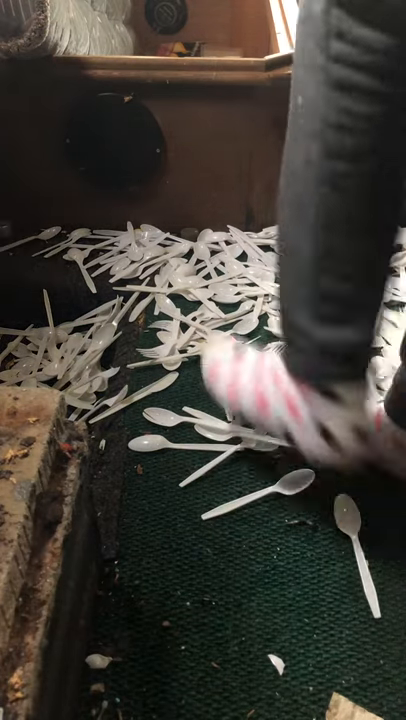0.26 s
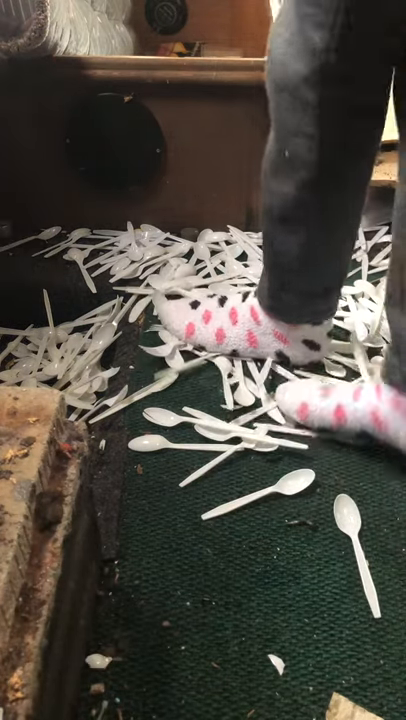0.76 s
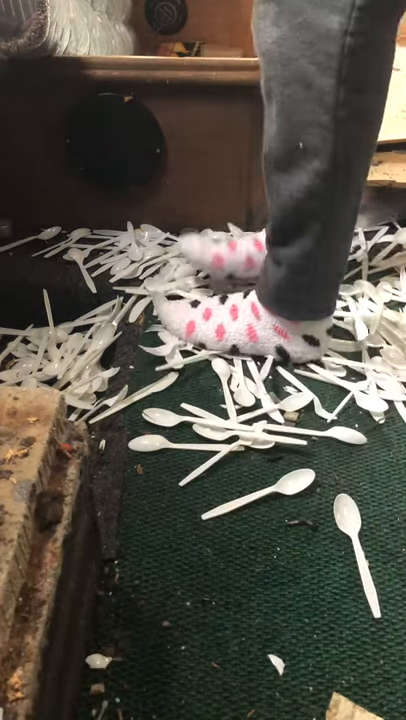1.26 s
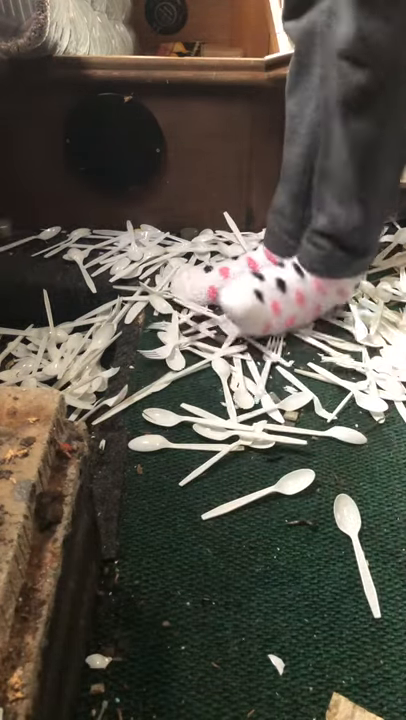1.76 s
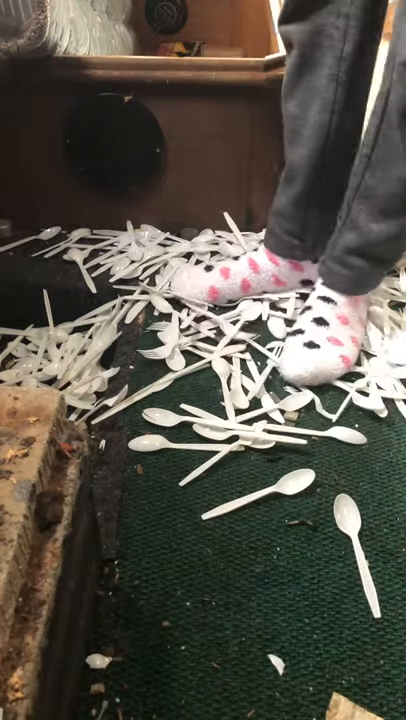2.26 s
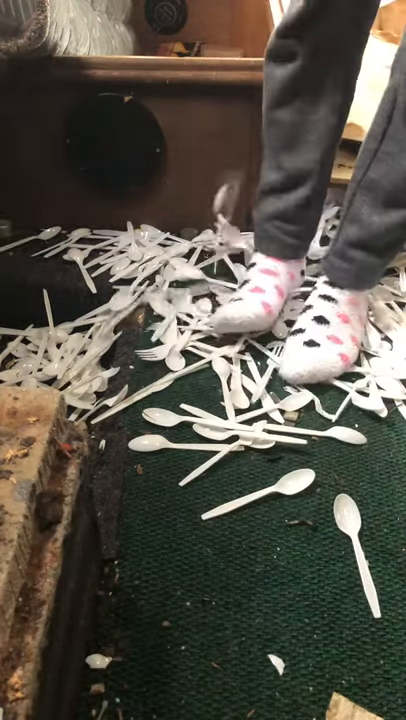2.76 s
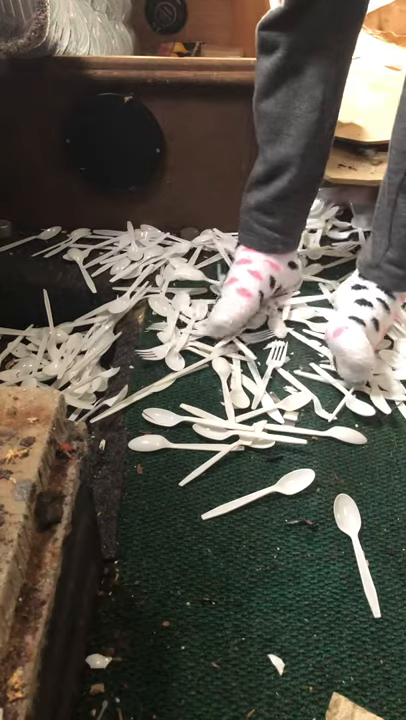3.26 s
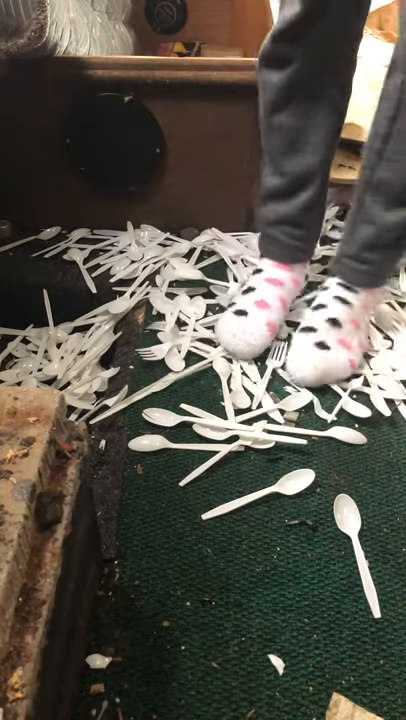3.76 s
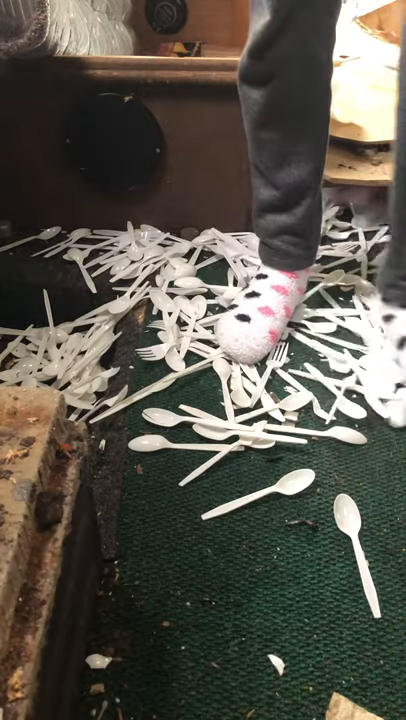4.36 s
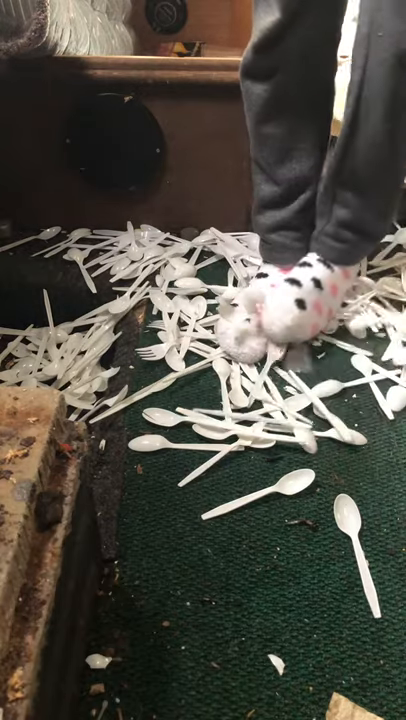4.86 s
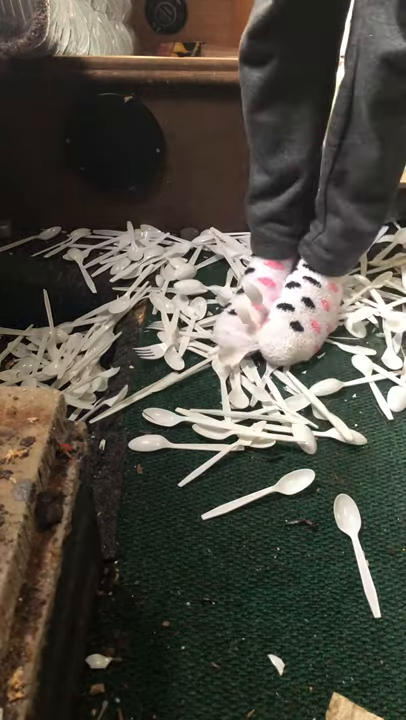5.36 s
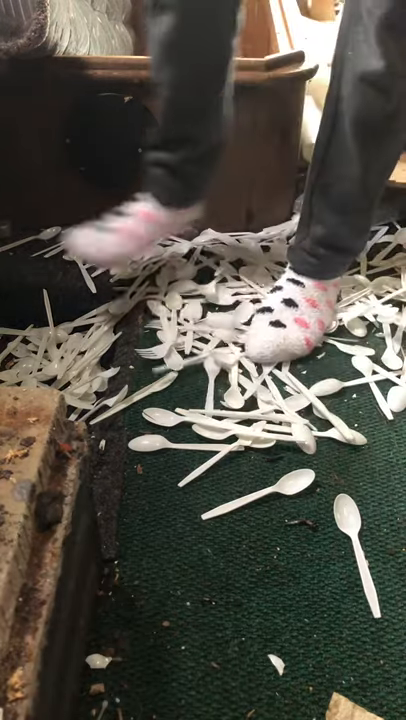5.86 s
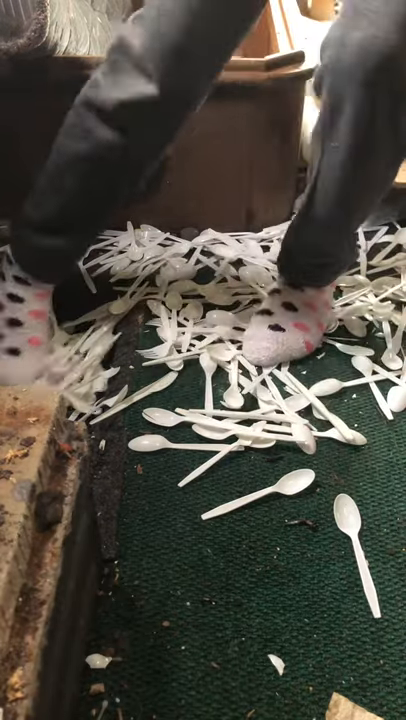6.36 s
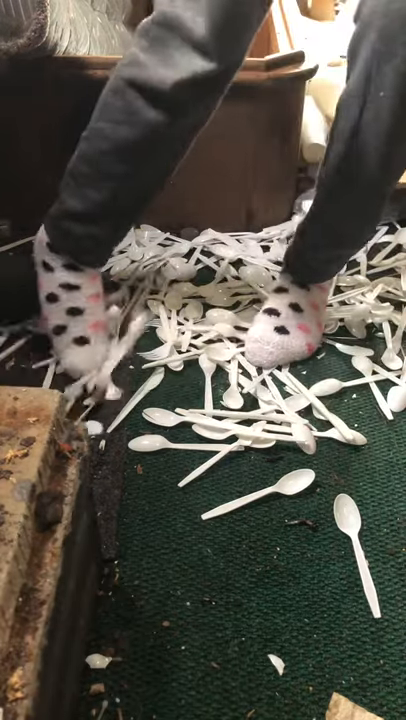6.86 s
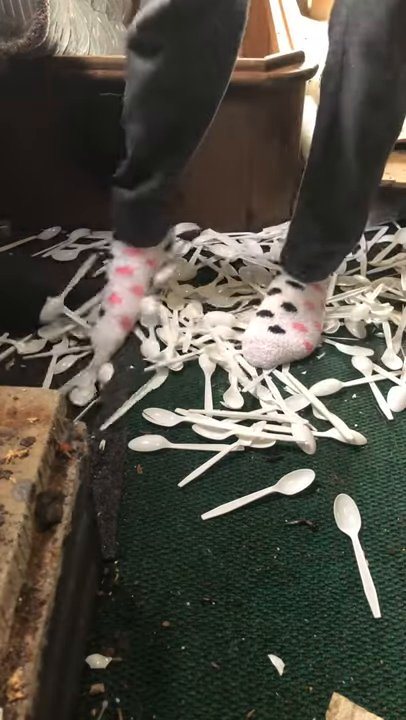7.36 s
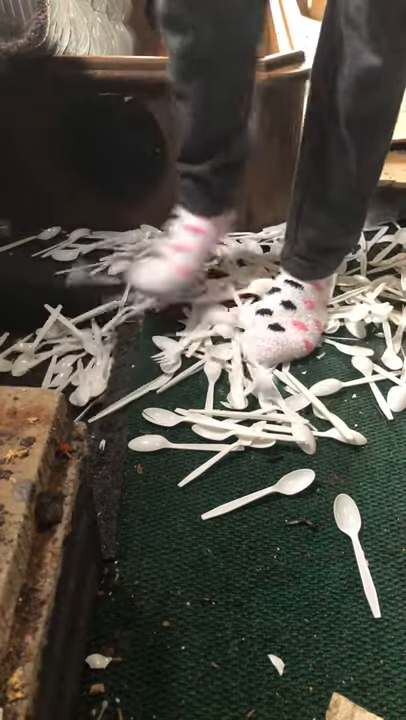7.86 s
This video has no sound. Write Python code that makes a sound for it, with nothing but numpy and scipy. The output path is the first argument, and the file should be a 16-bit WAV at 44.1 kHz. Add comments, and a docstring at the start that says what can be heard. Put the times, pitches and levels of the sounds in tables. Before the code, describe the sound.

Socked feet trample a heap of disposable plastic spoons and forks on carpet, with bright clattering, sharp cracks, hollow pops and soft thuds.

```python
"""A faint rumble and low hum in a small room; half a second in, feet in socks start to trample
a heap of disposable plastic spoons and forks on a carpet. Stirred pieces scrape and tick (filtered noise
and damped modes); loaded ones click, crack and ring (noise bursts, modes); spoon bowls buckle with
a hollow pop (shell modes, dull noise); each step thuds into the floor (filtered impulse and noise)."""
import sys
import numpy as np
from scipy import signal
from scipy.fft import rfft, irfft, next_fast_len
from scipy.io import wavfile
from scipy.ndimage import uniform_filter1d

SR = 44100
rng = np.random.default_rng(int(sys.argv[2]) if len(sys.argv) > 2 else 0)


def inscribe(sig):
    """Save sig as 16-bit PCM at rate SR to the path in sys.argv[1].

    A 1-D sig is mono; a 2-D sig holds one channel per row.
    Samples are clipped to [-1, 1] before scaling.
    """
    pcm = np.round(np.clip(np.atleast_2d(sig).T, -1, 1) * 32767)
    wavfile.write(sys.argv[1], SR, pcm.astype(np.int16))


N = 357210
TIME_S = np.arange(N) / SR
RING_S = np.arange(SR // 10) / SR  # time since a blow
RING_SIZE = len(RING_S)
TOP_HZ = 15850


def clatter(tick_trim_db=-1):
    """Pieces scrape and tick against each other; the feet touch only a few at a time as they work along."""
    reached_s = np.linspace(0, N / SR, 420)
    heap = [heap_piece(db) for db in shoving(reached_s)]
    times_s, sizes = contacts(count=2200, scatter_db=2.5, size=24)
    nearby = np.searchsorted(reached_s, times_s) + rng.integers(-3, 3, len(times_s))
    touched = np.clip(nearby, 0, len(heap) - 1)
    gains = sizes * undb(tick_trim_db + shoving(times_s)) * stick_slip(times_s)
    out = scraping(heap, reached_s)
    for start_s, gain, k in zip(times_s, gains, touched):
        add(out, start_s, gain * heap[k])
    return out


def scraping(heap, reached_s, trim_db=-5):
    """Pieces slide over each other: friction keeps each one sounding briefly before the next takes over."""
    slide = unit(np.hanning(3 * N // len(heap))) * np.sqrt(N / len(heap))
    out = np.zeros(N)
    for start_s, sound in zip(reached_s - len(slide) / SR / 2, heap):
        friction = slide * rng.standard_normal(len(slide))
        add(out, start_s, signal.fftconvolve(friction, sound))
    moments_s = TIME_S[::40]
    gain = undb(trim_db + shoving(moments_s)) * stick_slip(moments_s)
    return out * np.interp(TIME_S, moments_s, gain)


# a foot presses, drags or lifts through the heap:
# start_s, swell_s, length_s, clatter_db (before tick and scrape trims), knock_db
SHOVES = [(0.532, 0.009, 0.028, -36, -53), (0.619, .005, 0.14, -41.5, -49), (0.837, 0.013, 0.13, -34, -64),
          (1.003, 0.013, 0.11, -38, -67), (1.212, 0.091, 0.14, -29, -45.5),
          (1.365, 0.023, 0.18, -36.5, -48.5), (1.529, .01, 0.12, -43, -57),
          (1.731, 0.2, 0.31, -36.5, -48.5), (2.064, 0.012, 0.08, -48.5, -54),
          (2.181, 0.0089, 0.093, -30.5, -46.5), (2.352, 0.0058, .05, -38.5, -51),
          (2.404, 0.0069, 0.056, -25, -46), (2.48, .01, 0.15, -31.5, -60), (2.625, 0.044, 0.33, -28, -46.5),
          (2.922, 0.0077, .14, -30.5, -49), (3.112, 0.02, 0.048, -39.5, -49), (3.194, .01, 0.087, -53, -55),
          (3.33, 0.024, 0.062, -51, -58), (3.476, 0.22, 0.42, -49, -58),
          (3.729, 0.064, 0.066, -38.5, -52.5), (3.926, .03, 0.15, -40, -59), (4.251, 0.01, 0.01, -45, -62),
          (4.261, 0.0092, 0.064, -28, -49), (4.363, 0.077, 0.17, -28.5, -46.5),
          (4.562, 0.073, 0.36, -23, -43), (4.915, .01, 0.22, -38.5, -55.5),
          (5.226, 0.17, 0.34, -52.5, -56.5), (5.579, 0.0055, 0.022, -19.5, -47),
          (5.665, 0.04, 0.064, -22, -42.5), (5.844, 0.14, 0.13, -42, -56),
          (6.134, 0.035, 0.039, -43.5, -57), (6.235, 0.023, 0.13, -33, -54), (6.353, 0.033, 0.12, -27, -48),
          (6.516, .12, 0.14, -25, -50), (6.7, .01, .12, -32.5, -52.5), (6.798, 0.04, 0.2, -21, -39),
          (7.008, 0.011, 0.275, -26.5, -46.5), (7.316, 0.17, 0.27, -25.5, -50),
          (7.46, 0.15, 0.43, -22.5, -46.5), (7.915, 0.03, 0.27, -32, -53)]
GRIP_DB = 8.5  # a shove starts this far under its peak
SAG_DB_PER_S = 24  # the pieces make way while the foot pushes on
SETTLE_DB_PER_S = 249  # the heap comes to rest once the foot stops
KNOCK_SETTLE_DB_PER_S = 168  # the pieces under the sole take longer
REST_CLATTER_DB, REST_KNOCK_DB = -78.5, -74.5  # the heap creeps between shoves


def shoving(t_s, knock=False):
    """Clatter or knocking level in dB: each shove swells, sags while it lasts, then settles; the loudest counts."""
    start_s, swell_s, length_s, clatter_db, knock_db = np.transpose(SHOVES)[:, :, None]
    if knock:
        peak_db, settle_db_per_s, rest_db = knock_db, KNOCK_SETTLE_DB_PER_S, REST_KNOCK_DB
    else:
        peak_db, settle_db_per_s, rest_db = clatter_db, SETTLE_DB_PER_S, REST_CLATTER_DB
    age_s = t_s - start_s
    grip_db = GRIP_DB * np.clip(1 - age_s / np.maximum(swell_s, 1e-3), 0, 1)
    sag_db = SAG_DB_PER_S * np.maximum(age_s - swell_s, 0)
    settle_db = settle_db_per_s * np.maximum(age_s - length_s, 0)
    level_db = np.where(age_s >= 0, peak_db - grip_db - sag_db - settle_db, rest_db)
    return np.maximum(level_db.max(axis=0), rest_db)


def stick_slip(times_s):
    """Gain of a heap that holds and gives way by turns, about thirty times a second."""
    knots_s = np.cumsum(rng.uniform(.006, .028, 600))
    swing_db = 2.2 * rng.uniform(.2, 1.6, len(knots_s)) * (-1) ** np.arange(len(knots_s))
    return undb(np.interp(times_s, knots_s, swing_db))


def contacts(count, scatter_db, size):
    """Times and sizes of random contacts: many faint, a few strong, at unit power over `size` neighbours."""
    times_s = np.sort(rng.uniform(0, N / SR, count))
    sizes = undb(scatter_db * np.minimum(rng.exponential(size=count), np.log(150)))
    local_power = uniform_filter1d(sizes ** 2, size) * count / N
    return times_s, sizes / np.sqrt(local_power)


# colour of a bare plastic contact: freq_hz, gain_db
TICK_COLOUR = [(200, -25), (700, -7), (1300, -7.5), (2200, 0), (3600, 2.5), (5600, 3.5), (6700, -1.5),
               (8000, 2), (9800, -3), (12500, 3.5), (15800, 0), (17500, -9)]


def heap_piece(stir_db, ring_db=-3, hardness_db_per_octave=1.5, firm_db=-35, hardening=0.12):
    """One piece in its spot: a tick of its own colour and its ring, brighter the harder it is shoved."""
    own_colour = [(hz, db + 2.5 * rng.standard_normal()) for hz, db in TICK_COLOUR]
    tick = unit(colour(burst(t60_s=.014), own_colour))
    tilt_db = hardening * (stir_db - firm_db) + hardness_db_per_octave * rng.standard_normal()
    return unit(room(brighten(tick + undb(ring_db) * piece(), tilt_db)))


# nominal modes of one piece of cutlery: freq_hz, level_db
PIECE_MODES = [(1890, -13.5), (2750, -21), (3950, -3), (5200, -5.5), (5880, 1), (7380, -1), (8430, -2),
               (10500, -8.5), (11850, -6.5), (13000, -15)]
SHARD_SHARE = .35  # chance that a piece is broken
RING_T60_S = .042  # nominal: the heap and the carpet soon stop a piece


def piece(spread=0.026, scatter_db=5.0, shard_octaves=0.19):
    """Ring of one piece: size detunes it, the point struck picks the modes, the neighbours damp it."""
    hz, db = np.transpose(PIECE_MODES)[:, :, None]
    detune, strength, phase = rng.standard_normal((3, len(PIECE_MODES), 1))
    # a broken shard has a length, and so a pitch, of its own
    broken = rng.random() < SHARD_SHARE
    shift = 2 ** (broken * shard_octaves * rng.uniform(-1.018, 1))
    hz = np.minimum(hz * (1 + spread * detune) * shift, TOP_HZ)
    t60_s = RING_T60_S * rng.uniform(.6, 1.5) * np.minimum(10000 / hz, 1)  # high modes die sooner
    waves = np.sin(2 * np.pi * (hz * RING_S + phase))
    return unit(np.sum(undb(db + scatter_db * strength) * waves * fade(t60_s), axis=0))


# pieces that break and splinter under the foot: start_s, level_db (onset rms)
CRACKS = [(0.533, -37), (0.541, -28), (0.63, -40), (0.815, -30), (0.844, -32.5), (0.965, -26), (1.088, -16),
          (1.319, -20.5), (1.422, -20), (1.5, -31.5), (1.799, -26), (1.879, -31), (1.921, -29),
          (1.992, -22), (2.076, -29), (2.184, -24), (2.277, -31.5), (2.407, -14.5), (2.574, -26),
          (2.628, -23), (2.826, -21), (2.924, -15), (3.019, -27.5), (3.131, -32), (3.781, -34.5),
          (3.965, -35), (4.001, -32.5), (4.295, -22), (4.387, -28.5), (4.449, -26.5), (4.488, -28),
          (4.561, -21.5), (4.595, -17.5), (4.639, -14), (4.664, -13), (4.787, -19), (5.377, -44.5),
          (5.515, -28), (5.561, -26.5), (5.588, -16.5), (5.697, -17.5), (5.717, -15.5), (6.853, -14.5),
          (6.882, -15.5), (6.907, -18), (7.072, -18), (7.089, -16), (7.511, -17.5), (7.585, -24),
          (7.705, -20), (7.874, -22), (7.972, -17.5), (7.981, -13), (8.09, -24)]
CRACK_EVEN_DB = -39.5  # a crack this strong gets no treble tilt
CRACK_HARDENING = 0.16  # dB per octave of extra treble for each dB above that


def cracks(ring_db=-5, snap_db=-6, snap_t60_s=0.023, splinter_t60_s=0.061, spread_s=0.0036, splinter_db=3):
    """A snap and uneven splintering that spreads and dies while the piece rings; strong ones are brighter."""
    out = np.zeros(N)
    for start_s, level_db in CRACKS:
        steps = undb(splinter_db * rng.standard_normal(RING_SIZE))
        uneven = np.repeat(steps, 32)[:RING_SIZE]
        splinters = unit(burst(splinter_t60_s) * uneven * np.minimum(RING_S / spread_s, 1))
        fracture = splinters + undb(snap_db) * unit(burst(snap_t60_s))
        tilt_db = CRACK_HARDENING * (level_db - CRACK_EVEN_DB)
        add(out, start_s, struck(fracture, level_db, ring_db, tilt_db))
    return out


# a bent piece slips off its neighbour with one dry click: start_s, level_db (onset rms)
CLICKS = [(0.57, -21.5), (1.735, -42), (2.172, -41), (2.258, -29), (2.356, -31), (2.549, -24.5),
          (2.911, -25), (3.233, -41), (3.598, -42), (3.906, -30), (4.057, -39.5), (4.178, -50),
          (4.697, -24), (4.755, -23), (4.898, -20), (5.01, -32), (5.179, -42.5), (5.351, -42.5),
          (5.454, -45), (5.667, -16.5), (5.859, -30), (6.135, -25.5), (6.959, -16), (7.171, -22.5),
          (7.325, -32), (7.437, -20.5)]


def clicks(t60_s=0.023, ring_db=-7, tilt_db=1.5):
    """One short, bright contact; the piece stays pinned and hardly rings."""
    out = np.zeros(N)
    for start_s, level_db in CLICKS:
        add(out, start_s, struck(burst(t60_s), level_db, ring_db, tilt_db))
    return out


def struck(contact, level_db, ring_db, tilt_db):
    """A contact and the ring of its piece at a given level, tilted to the treble by tilt_db per octave."""
    sound = unit(colour(contact, TICK_COLOUR)) + undb(ring_db) * piece()
    return attack(room(brighten(sound, tilt_db)), level_db, size=176)


# spoon bowls that buckle under the sole: start_s, level_db (before trim_db), pitch_hz
POPS = [(0.57, -16.5, 590), (1.09, -22.5, 1330), (1.679, -32, 1300), (1.745, -37, 625), (1.783, -37, 470),
        (2.08, -28.5, 787), (2.257, -28.5, 1045), (2.911, -24.5, 970), (3.907, -28.5, 450),
        (5.029, -28, 950), (5.514, -23.5, 460), (5.587, -8.5, 1116), (6.136, -16.5, 1065),
        (6.439, -27, 950), (6.525, -29, 855), (6.553, -29.5, 1300)]
# modes of a spoon bowl: pitch_multiple, level_db
BOWL_MODES = [(1, 0.5), (1.7, -5.5), (2.75, -9)]


def pops(bowl_t60_s=0.02, crunch_db=-4, crunch_t60_s=0.095, trim_db=-6):
    """A bowl gives way: a few heavily damped shell modes and a dull crunch."""
    crunch_colour = [(40, -72), (300, -3.5), (1200, -0.5), (3000, -6.5), (8000, -21)]  # Hz, dB
    out = np.zeros(N)
    for start_s, level_db, pitch_hz in POPS:
        modes = sum(undb(mode_db) * np.sin(2 * np.pi * multiple * pitch_hz * RING_S)
                    for multiple, mode_db in BOWL_MODES)
        crunch = unit(colour(burst(crunch_t60_s), crunch_colour))
        sound = unit(modes * fade(bowl_t60_s)) + undb(crunch_db) * crunch
        add(out, start_s, attack(room(sound, wet_db=-7), level_db + trim_db, size=176))
    return out


# the foot meets the floor: start_s, level_db (onset rms)
THUDS = [(0.572, -38.5), (1.096, -35.5), (2.086, -45), (2.915, -34.5), (3.906, -38.5), (5.517, -30),
         (5.589, -35.5), (5.713, -41.5), (6.139, -38), (6.442, -31), (6.528, -36.5), (6.556, -42)]
# colour of the floor under a step: freq_hz, gain_db
FLOOR_COLOUR = [(40, -55), (120, 0), (198, 8), (300, -9), (480, -6), (1000, -19.5), (6000, -69)]


def thuds(t60_s=0.073, rumble_db=-6):
    """The step goes through the carpet as one push, and the floor shakes briefly after it."""
    out = np.zeros(N)
    for start_s, level_db in THUDS:
        push = signal.unit_impulse(RING_SIZE) + undb(rumble_db) * unit(burst(t60_s))
        add(out, start_s, attack(room(colour(push, FLOOR_COLOUR)), level_db, size=1100))
    return out


# colour of a knock muffled by foot and carpet: freq_hz, gain_db
MUFFLED_COLOUR = [(50, -28), (110, -4.5), (200, 3), (300, -8), (430, -2), (650, -14), (1200, -5.5),
                  (4000, -37)]


def knocking(t60_s=.09):
    """Pieces pressed under the sole shift and knock dully on the carpet."""
    times_s, sizes = contacts(count=900, scatter_db=1.0, size=8)
    knocks, decay = np.zeros(N), unit(fade(t60_s))
    for start_s, gain in zip(times_s, sizes * undb(shoving(times_s, knock=True))):
        add(knocks, start_s, gain * decay * rng.standard_normal(RING_SIZE))
    carpet = unit(colour(signal.unit_impulse(RING_SIZE), MUFFLED_COLOUR))
    return signal.oaconvolve(knocks, carpet)[:N]


# spectrum shape of the still air: freq_hz, relative_level_db (per Hz)
AIR_COLOUR = [(15, -21), (25, -6), (55, -12.5), (112, -10.5), (207, -21.5), (637, -28.5), (15000, -43)]


def air(rumble_db=-61.5, hum_db=-66.5, hum_hz=108.7):
    """Faint room rumble, as coloured noise, with a low sine hum; both levels are rms."""
    rumble = attack(colour(rng.standard_normal(N), AIR_COLOUR), rumble_db, size=N)
    return rumble + undb(hum_db) * np.sqrt(2) * np.sin(2 * np.pi * hum_hz * TIME_S)


def room(x, t60_s=0.15, first_s=0.0044, wet_db=-6):
    """Nearby furniture throws back echoes that the carpet soon soaks up; each call has its own pattern."""
    onset = np.clip(RING_S / first_s - 1, 0, 1)
    echoes = rng.standard_normal(RING_SIZE) ** 3 * fade(t60_s) * onset
    return signal.fftconvolve(x, signal.unit_impulse(RING_SIZE) + undb(wet_db) * unit(echoes))


def brighten(x, db_per_octave):
    """Harder contacts tilt the sound towards the treble, from 2 to 16 kHz."""
    return colour(x, [(2000, 0), (16000, db_per_octave * np.log2(8))])


def colour(x, points):
    """Causal filter through (Hz, dB) points: minimum phase, built from the folded cepstrum."""
    n = next_fast_len(2 * len(x), True)
    hz, db = np.transpose(points)
    bins_hz = np.arange(n // 2 + 1) * SR / n
    gain = undb(np.interp(np.log(bins_hz + 1), np.log(hz), db))
    cepstrum = irfft(np.log(gain), n)
    cepstrum[1:n // 2] *= 2
    cepstrum[n // 2 + 1:] = 0
    return irfft(rfft(x, n) * np.exp(rfft(cepstrum)), n)[:len(x)]


def burst(t60_s):
    """White noise that dies away."""
    return rng.standard_normal(RING_SIZE) * fade(t60_s)


def fade(t60_s, t_s=RING_S):
    """Exponential decay, 60 dB down after t60_s."""
    return np.exp(-np.log(1000) * t_s / np.maximum(t60_s, 1e-3))


def undb(db):
    """Decibels to gain."""
    return 10 ** (np.asarray(db) / 20)


def unit(x):
    """Scale to unit energy."""
    return x / np.sqrt(np.sum(x ** 2))


def attack(x, level_db, size):
    """Set the rms level of the first `size` samples."""
    return undb(level_db) * x / np.sqrt(np.mean(x[:size] ** 2))


def add(out, start_s, x):
    """Mix x into out from start_s on."""
    i = max(int(start_s * SR), 0)
    out[i:i + len(x)] += x[:max(len(out) - i, 0)]


def scene():
    """The heap and the floor under the feet, over the still room."""
    return (clatter() + cracks() + clicks() + pops() + thuds() + knocking() + air())[None]


def record(dry):
    """The microphone rounds the sharpest peaks, drops the deepest rumble and cuts the top."""
    ceiling = .8
    rounded = ceiling * np.tanh(dry / ceiling)
    thinned = signal.sosfilt(signal.butter(3, 48, "high", fs=SR, output="sos"), rounded)
    return signal.sosfilt(signal.ellip(10, .2, 70, TOP_HZ, fs=SR, output="sos"), thinned)


dry = scene()
out = record(dry)
inscribe(out)
```